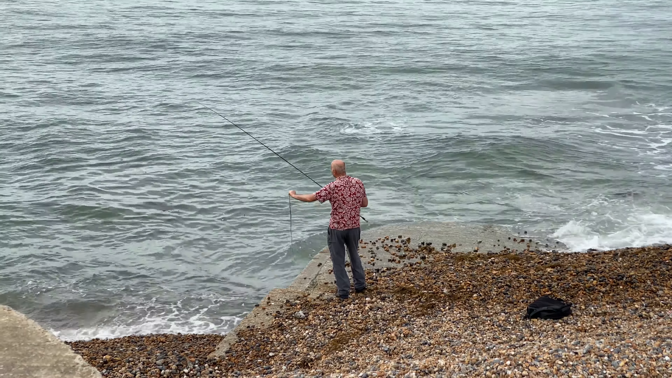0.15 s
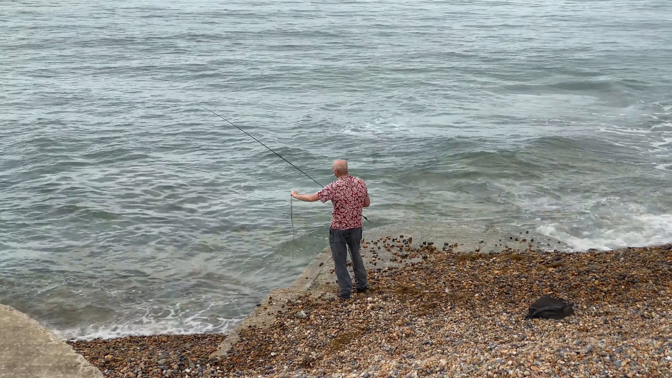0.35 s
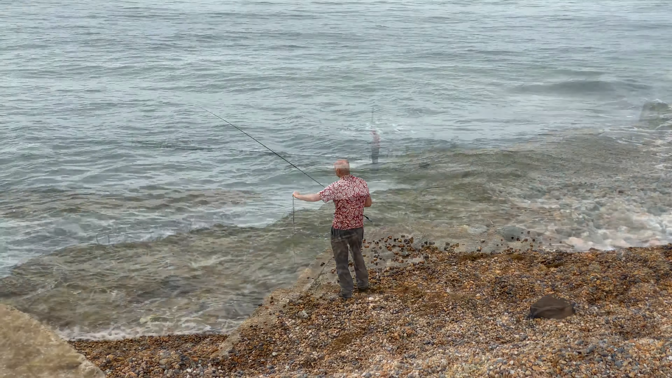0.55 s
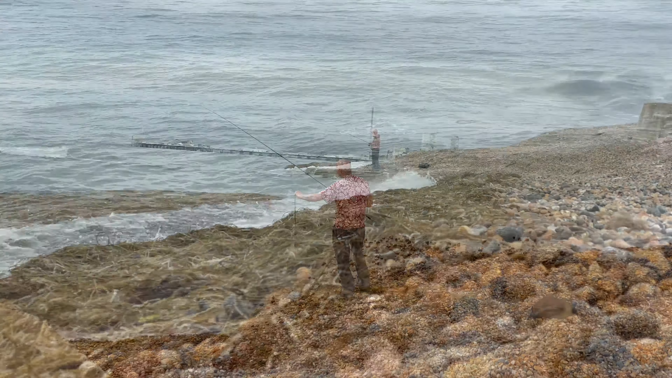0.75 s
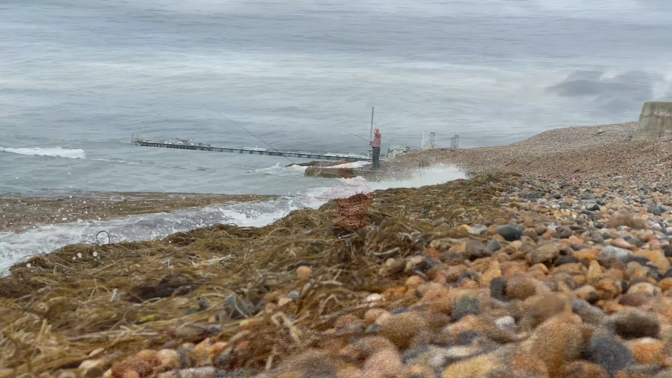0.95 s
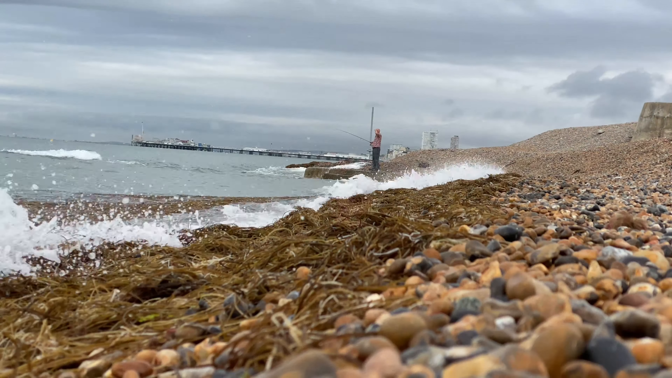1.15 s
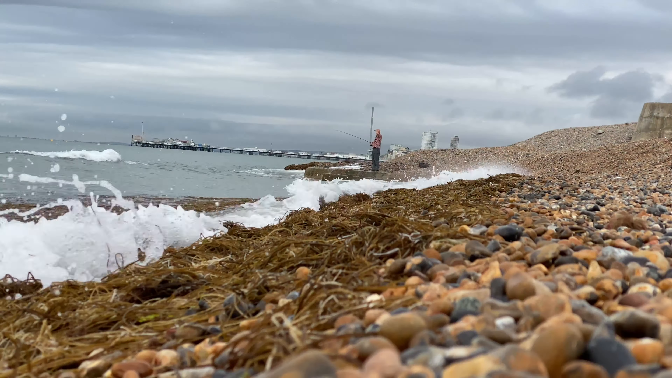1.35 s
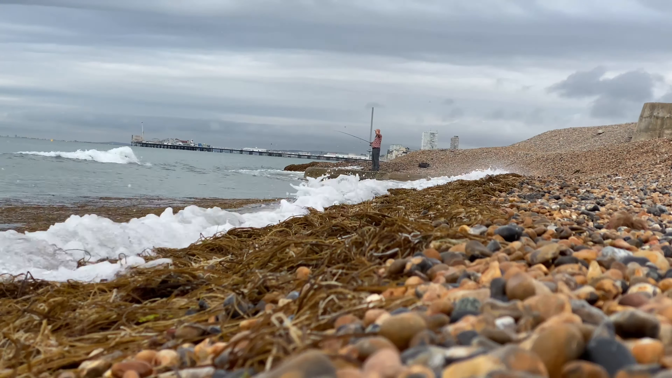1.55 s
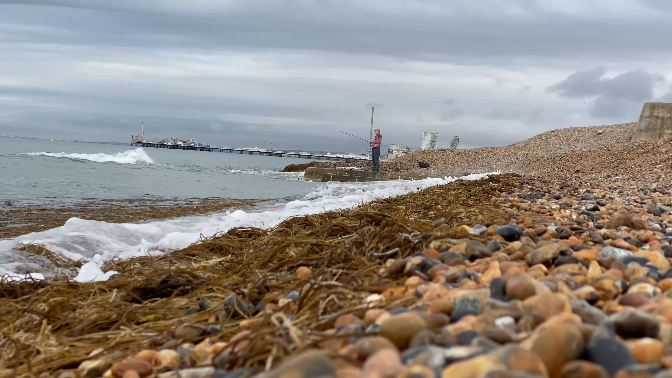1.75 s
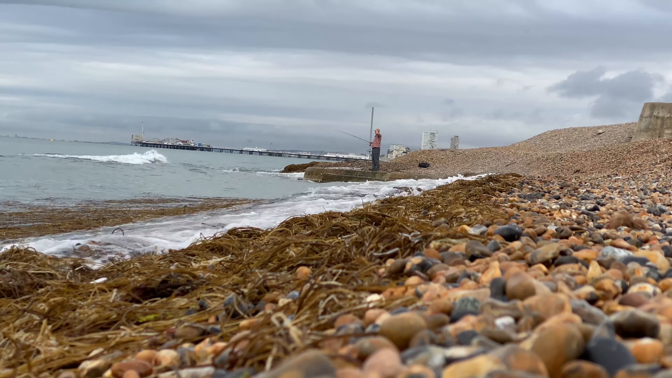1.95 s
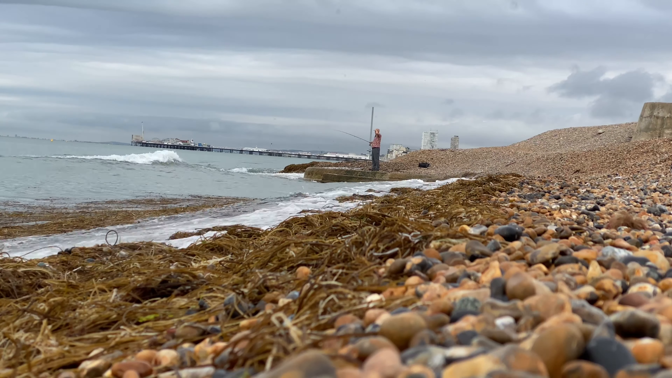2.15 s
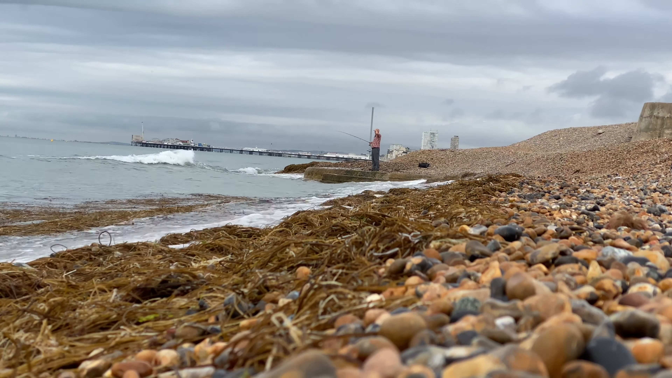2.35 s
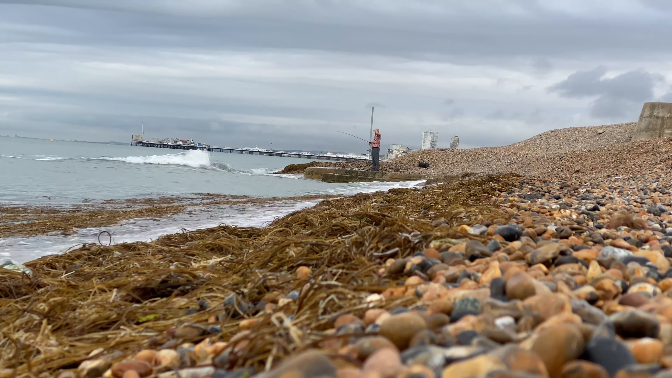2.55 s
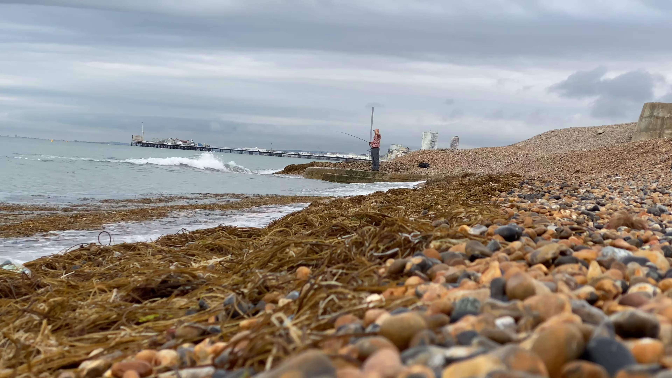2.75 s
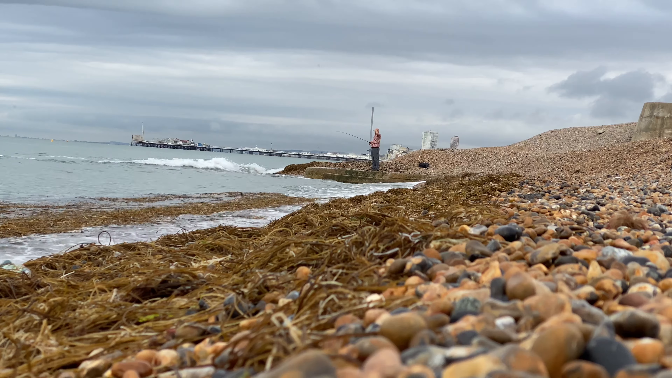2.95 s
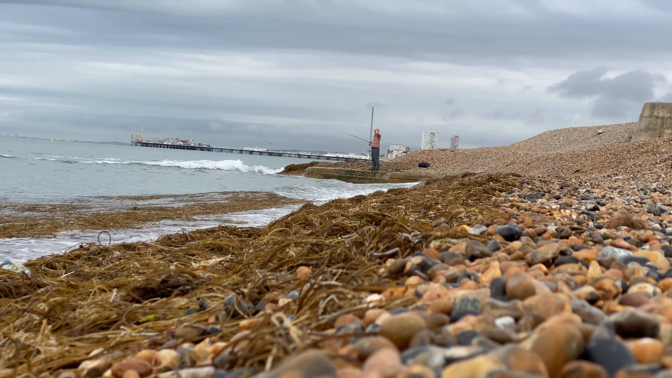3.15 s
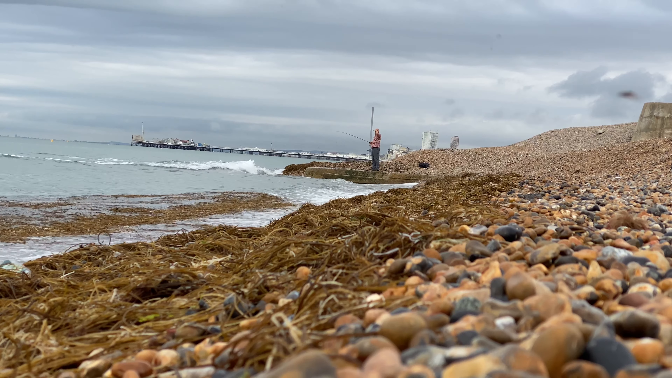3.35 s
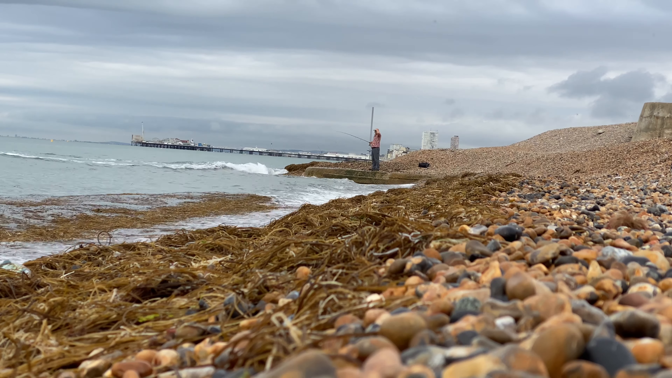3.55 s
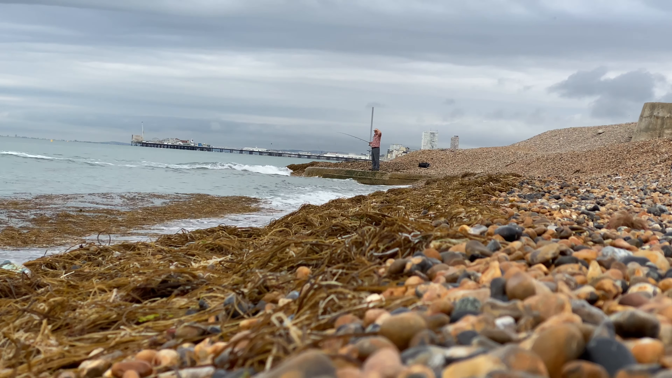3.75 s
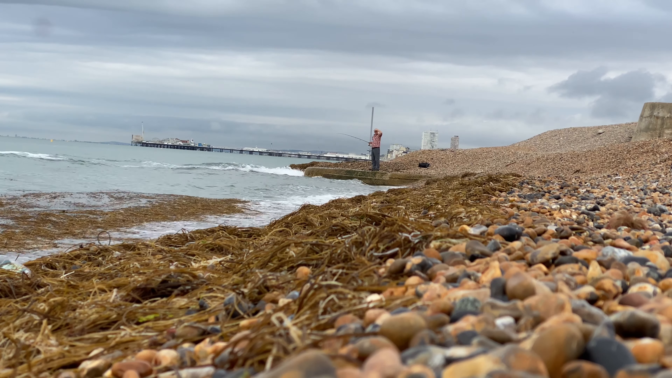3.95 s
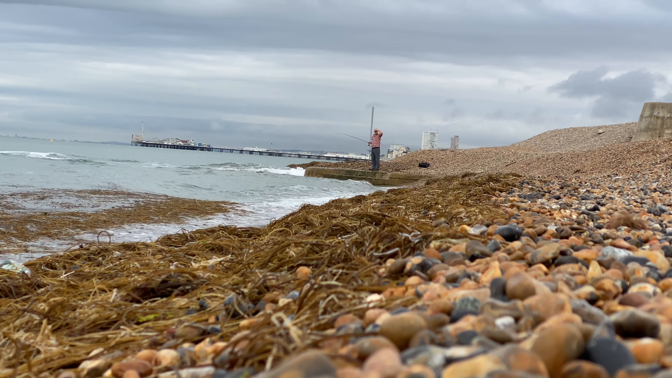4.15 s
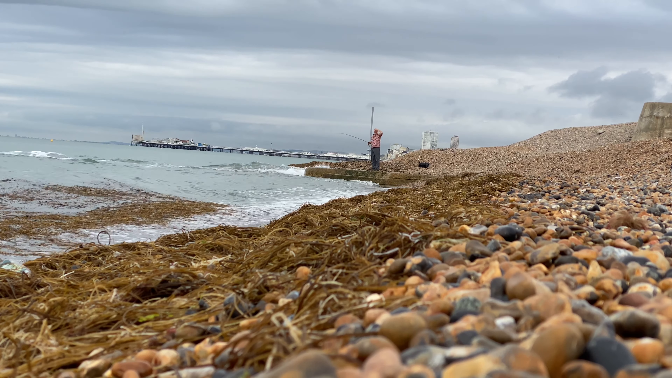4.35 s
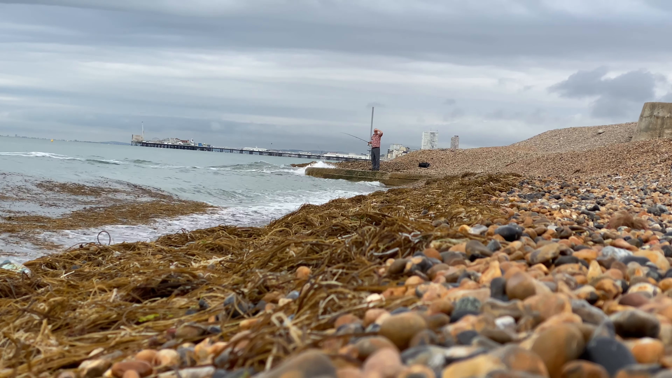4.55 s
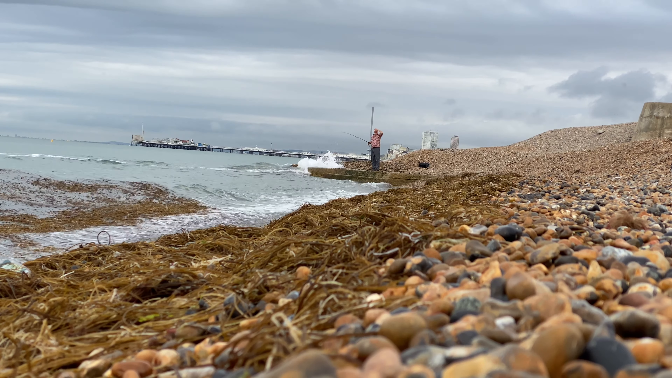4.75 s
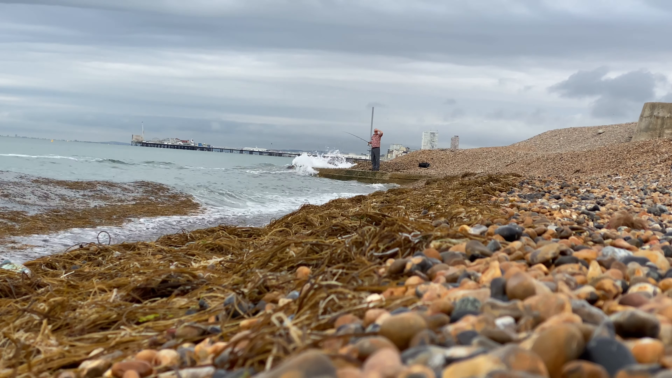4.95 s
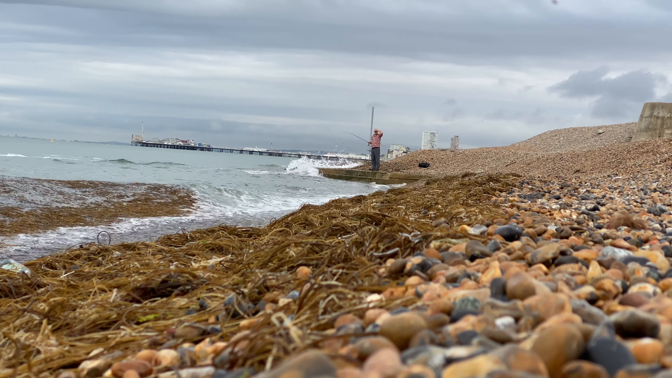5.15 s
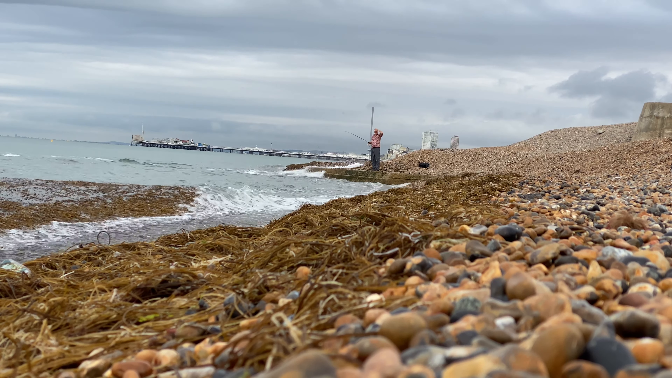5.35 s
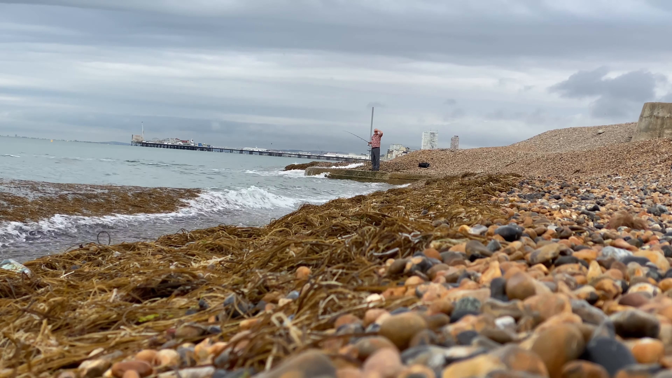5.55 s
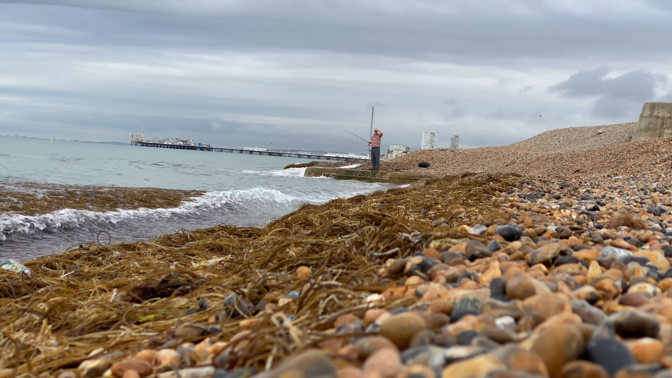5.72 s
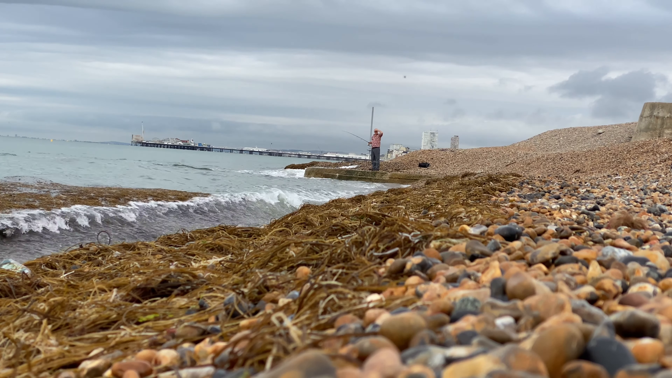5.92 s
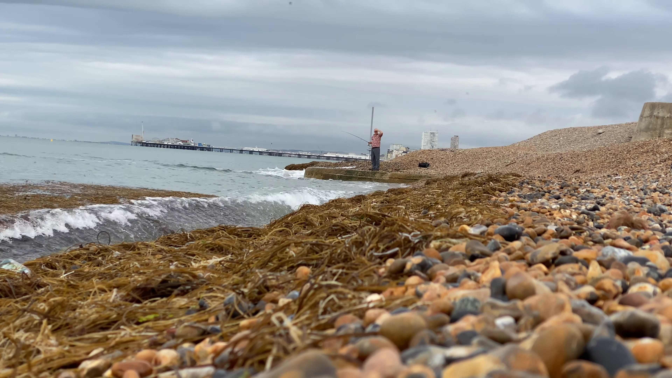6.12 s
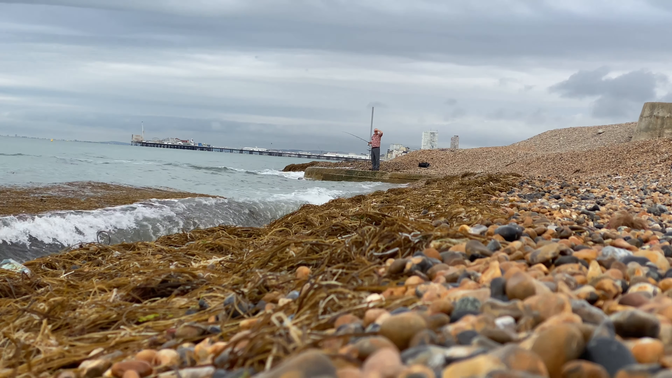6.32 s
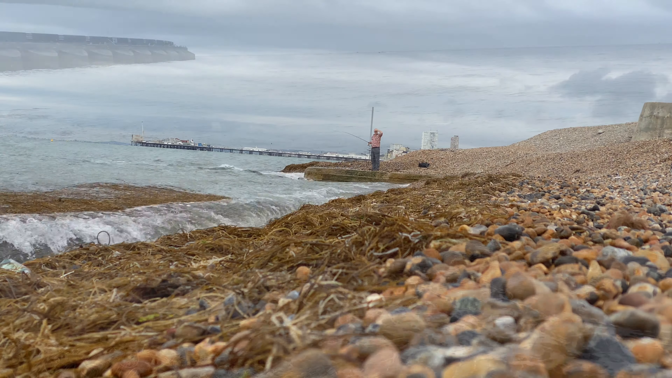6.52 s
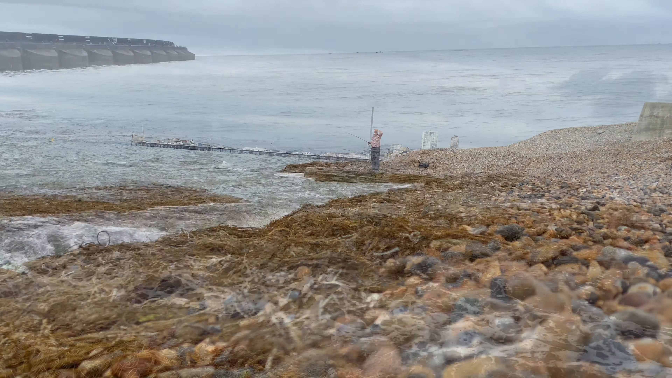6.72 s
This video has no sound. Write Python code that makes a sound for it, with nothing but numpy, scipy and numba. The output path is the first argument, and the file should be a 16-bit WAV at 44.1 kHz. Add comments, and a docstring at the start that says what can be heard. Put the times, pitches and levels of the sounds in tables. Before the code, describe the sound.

Outdoors on a pebble shore, heard in stereo from low among the stones. It starts with quiet foamy wash, faint distant sea hiss and soft wind rumble. From 0.3 s a wave swells; at 0.65 s its crest lands with hollow low thumps, then booms and roars, strongest around 0.9 to 1.3 s, full of rounded bubble glugs and bright fizzing spray. A splashy wash follows near 1.4 to 1.6 s, then it falls away; a drop ticks at 1.8 s. From 1.7 to 3 s foam thins over scattered pebble knocks. Gurgles and plops lap around 3.4 to 4 s. The quietest stretch, about 4.3 to 5.8 s, leaves dense, dry pebble clicks and light rattling. Near 6.1 s a low slosh and gurgles return, spray and rattle rise from 6.3 s, and another rushing, splashing water scene fades in, opening wide until the cut near 6.9 s.

```python
"""A small wave thumps and roars ashore on a pebble beach, heard from two ports lying low among the stones.
The surf is coloured noise mixed with showers of short rings; crest thumps, bubbles and ticks are dying sines.
Foam washes and fizzes, water gurgles, and pebbles click and rattle in the backwash as two-pitch knocks.
The far sea hisses steadily and wind rumbles on the microphone.
Another scene of rushing water fades in at the end, wide between the channels.
"""
import sys
import numpy as np
from scipy import signal
from scipy.fft import rfft, irfft
from scipy.io import wavfile
from scipy.ndimage import uniform_filter1d
from numba import njit

SR = 44100
rng = np.random.default_rng(int(sys.argv[2]) if len(sys.argv) > 2 else 0)


def wrap_up_sound(samples):
    """Save the sound to the file named by the first command line argument, as 16-bit audio."""
    columns = np.atleast_2d(samples).T
    # keep every value between -1 and 1, then stretch to whole-number steps
    tamed = np.clip(columns, -1, 1)
    steps = np.round(tamed * 32767).astype(np.int16)
    wavfile.write(sys.argv[1], SR, steps)


N = 303408
T, HZ = np.arange(N) / SR, np.fft.rfftfreq(N, 1 / SR)

# Far sea, a steady hiss: colour (frequency [Hz], gain [dB])
FAR_COLOUR = [(200, -13), (320, 4.5), (420, -3.5), (800, -9), (1300, -15), (2500, -13), (4000, -35.5),
              (8000, -23.5), (12000, -26), (16000, -30)]
FAR_DB = -50

# Wind on the ports, deep rumble and quicker flutter: colours (frequency [Hz], gain [dB])
RUMBLE_COLOUR = [(22, -34), (32, -16), (42, -3), (55, 3), (68, 4.5), (85, -7.5), (120, -32)]
FLUTTER_COLOUR = [(55, -21), (75, -3.5), (95, 4), (120, -2.5), (150, -4), (230, -15)]
# Gusts: (time [s], half length [s], rumble [dB], flutter [dB])
GUSTS = [(0.05, 0.088, -63, -40.5), (0.68, 0.058, -39, -38), (1.473, 0.12, -52, -34.5),
         (2.854, 0.056, -39, -63), (4.07, 0.052, -44, -58), (5.733, 0.23, -48, -44.5),
         (6.66, 0.043, -53, -37.5)]
STEADY_RUMBLE_DB, STEADY_FLUTTER_DB = -49.5, -51
# The falling crest shakes the same low bands, at these levels relative to its boom
CREST_RUMBLE_DB, CREST_FLUTTER_DB = -18, -9.5

# A drop ticks close by and bounces: (time [s], level [dB])
TICKS = [(1.8133, -24.5), (1.8301, -34)]
# What a tick rings with: (frequency [Hz], relative level [dB], t60 [s])
TICK_MODES = [(4700, -21, .0035), (5900, -6, 0.0056), (7250, 0, 0.0036), (10000, -6, .003),
              (13700, -4, .003)]

# Water gurgles between the stones as it drains and laps back: (time [s], level [dB])
GURGLE = [(0, -80), (3.2, -74), (3.45, -53), (3.7, -47), (3.87, -45.5), (4.1, -56), (4.3, -72), (4.9, -75),
          (5.1, -56), (5.3, -52), (5.6, -57), (5.85, -58), (5.98, -66), (6.04, -55), (6.08, -62),
          (6.12, -57), (6.15, -58), (6.18, -46), (6.21, -54), (6.24, -46), (6.3, -62), (6.5, -76),
          (6.88, -80)]
# Its colour: (frequency [Hz], gain [dB])
GURGLE_COLOUR = [(500, -17), (650, -11), (830, -7), (1000, -7), (1300, -13)]

# Pebbles dragged by the backwash: (time [s], rattle level [dB])
RATTLE = [(0, -56.5), (1.4, -56), (1.7, -69), (2.5, -62), (3.4, -79), (4.1, -73), (4.5, -62), (4.9, -56),
          (5.2, -57.5), (5.5, -55.5), (5.75, -56.5), (5.95, -57), (6.15, -56), (6.4, -51.5), (6.65, -50),
          (6.8, -50), (6.88, -53)]
# Their colour: (frequency [Hz], gain [dB])
RATTLE_COLOUR = [(1200, -38), (2000, -3.5), (3000, -1.5), (4500, 2), (6000, 0), (7500, -2), (9000, -43)]
# Single pebbles knock: (time [s], level [dB], pitch [Hz], crack over pitch [dB], crack pitch [Hz])
KNOCKS = [(1.6893, -27, 1960, -3, 3550), (1.721, -25, 1580, -14, 4500), (1.9118, -30, 1560, -8, 5500),
          (2.038, -31, 1800, -2.5, 3600), (2.198, -28, 1630, -6, 6500), (2.288, -39, 1950, -4, 4500),
          (2.3666, -24, 2120, -7.5, 2700), (2.4004, -31.5, 1980, -3, 5070), (2.4386, -37, 1880, 2, 4270),
          (2.4945, -36, 1830, 0, 2830), (2.5169, -34, 2030, -4, 2820), (2.5445, -33, 2210, -7, 6630),
          (2.718, -39, 2260, -5, 3190), (2.8177, -37, 1930, -5, 3260), (2.8277, -40, 1820, 4, 5980),
          (3.2547, -33, 1980, -15, 3150), (3.433, -36, 1930, -6, 2790), (3.6224, -44, 1920, 4, 4660),
          (3.9067, -42, 1720, 0, 4280), (3.9775, -28, 1930, -11, 2710), (4.3901, -35, 2400, -8, 2930),
          (4.4242, -34, 2540, -4, 3420), (4.4625, -38, 1830, -6, 3500), (4.4844, -38, 1600, -5, 3500),
          (4.6803, -38, 1780, -2, 3540), (4.5972, -39, 2470, -6, 4000), (4.7119, -35, 2100, 0, 3810),
          (4.717, -34, 2150, -3, 4500), (4.733, -44, 2000, 2, 5800), (4.7448, -41, 1980, -8, 3000),
          (4.7615, -33, 1750, -2, 3300), (4.778, -37, 1800, -2, 4500), (4.771, -44, 2000, 4, 6500),
          (4.802, -49, 2000, 6, 7000), (4.86, -37, 1900, 0, 5000), (4.8795, -31, 2060, -3, 4600),
          (4.885, -33, 1900, -8, 3000), (4.9027, -34, 1850, -2, 5490), (4.9314, -36, 2240, -8, 2700),
          (4.9384, -34, 2240, -6, 2900), (5.0042, -42, 1800, -10, 3000), (5.0486, -37, 1860, -10, 3000),
          (5.0601, -36.5, 2200, 4.5, 3900), (5.0985, -35, 1930, -4, 3000), (5.1394, -44, 1800, -3, 3500),
          (5.213, -34, 2020, -7, 3940), (5.2382, -41, 1960, -3, 4500), (5.258, -43, 2000, 5, 5800),
          (5.2821, -34, 1700, -8, 3980), (5.316, -41, 1830, 2, 6400), (5.3494, -43, 1860, 4, 4160),
          (5.438, -45, 2010, -1, 3460), (5.4517, -40, 2410, 3, 5070), (5.4926, -40, 2370, -8, 4520),
          (5.557, -42, 1670, -5, 2870), (5.678, -37.5, 1790, 4, 3660), (5.709, -39, 1780, -5, 2850),
          (5.7866, -38, 1940, -3, 4520)]
# Extra modes of a struck pebble: (frequency [Hz], level relative to the crack [dB], t60 [s])
CRACK_MODES = [(2570, -3.5, 0.0081), (3370, -1.5, 0.0077), (4200, -4.5, 0.0054), (5300, -7, 0.006),
               (6470, -7, 0.0054), (7300, -18, 0.005)]
KNOCK_T60_S, CRACK_T60_S = 0.007, 0.0043
# Crack modes are loudest near the crack pitch: width, and drop far from it
CRACK_OCTAVES, CRACK_DROP_DB = 0.53, -2
# Fainter random knocks, thickest as the backwash drains: (from [s], thickest [s], to [s])
STRAY_S = [1.7, 4.95, 5.75]
# Centres of the random draws, and the scatter of level
STRAY_DB, STRAY_SCATTER_DB, STRAY_HZ, STRAY_CRACK_DB = -51.5, 3.5, 1900, -2.5
SLIDE_S = 0.03  # time spread within a slide of stones
SCATTER_T60_S, SCATTER_DB = 0.021, -5.5  # neighbouring stones scatter every knock

# Big bubbles burst in the churn and the backwash: (time [s], level [dB], starting pitch [Hz])
GLUGS = [(0.689, -18, 640), (0.763, -27, 930), (0.923, -22, 762), (1.056, -21, 590), (1.135, -25, 580),
         (1.186, -17, 640), (1.246, -18, 511), (1.29, -24, 595), (1.366, -32, 710), (1.413, -25, 606),
         (1.452, -25, 482), (1.508, -26, 674), (1.549, -28, 480), (1.589, -17, 945), (1.651, -23, 729),
         (1.7, -26, 616), (1.783, -30, 568), (1.846, -25, 554), (1.912, -25, 570), (1.975, -18, 940),
         (2.041, -26, 680), (2.169, -28, 593), (2.753, -31, 635), (2.843, -27, 630), (2.941, -30, 730),
         (3.041, -37, 770), (3.219, -28, 635), (3.419, -23, 1180), (3.458, -25, 650), (3.52, -36, 867),
         (3.642, -29, 821), (3.72, -34, 837), (3.829, -35, 645), (3.856, -23, 870), (3.909, -37, 690),
         (4.002, -34, 1010), (4.084, -36, 910), (5.142, -33, 785), (5.201, -36, 636), (5.279, -43, 891),
         (6.029, -39, 580), (6.11, -33, 554), (6.164, -38, 511), (6.221, -36, 775), (6.409, -31, 476),
         (6.464, -29, 614)]
# Cycles to fall 60 dB, pitch rise over that time as a fraction, and soft onset
GLUG_CYCLES, GLUG_GLIDE, GLUG_SWELL_S = 21, 0.098, 0.0025

# Spray and splash: (time [s], fizz of spray [dB], splash of water over the stones [dB])
SPRAY = [(0, -62, -55), (0.3, -54, -56), (0.53, -47, -52.5), (0.66, -42, -48), (0.74, -45.5, -51),
         (0.95, -39.5, -45), (1.09, -44, -50), (1.22, -37.5, -49), (1.32, -38, -45), (1.41, -37.5, -40),
         (1.5, -38, -42), (1.58, -40.5, -46), (1.68, -48, -54), (1.95, -52.5, -67), (2.4, -53, -51),
         (3.2, -57, -53.5), (3.8, -64, -51.5), (4.1, -70, -50.5), (4.4, -80, -50.5), (4.9, -72, -52.5),
         (5.3, -70, -53), (5.85, -67, -59), (6.26, -55, -61), (6.33, -48, -61), (6.52, -51.5, -55),
         (6.7, -48, -46.5), (6.88, -46.5, -43)]
# Their colours: (frequency [Hz], gain [dB])
FIZZ_COLOUR = [(3000, -10.5), (5000, -2), (7000, -1.5), (9000, -2), (11000, -5), (13000, -7.5), (16000, -8)]
SPLASH_COLOUR = [(1500, -7.5), (2300, 2), (3000, 3.5), (4000, -2.5), (5000, -6.5), (6500, -11), (9000, -42)]

# Another scene of rushing water fades in at the end: (time [s], level [dB])
RUSH = [(0, -90), (6.0, -73), (6.25, -61), (6.45, -53), (6.6, -48), (6.68, -45), (6.72, -40), (6.76, -37.5),
        (6.79, -41), (6.83, -33), (6.86, -43), (6.88, -34)]
# Its colour: (frequency [Hz], gain [dB])
RUSH_COLOUR = [(200, -8), (270, 12), (340, 17), (450, 5), (600, -1), (1300, -7), (1860, -9), (2280, 3),
               (2560, 8), (2950, -12), (3500, -4), (4200, -2), (4700, -3), (5250, -27), (6700, -14),
               (8000, -24)]

# Trapped air thumps as the crest folds over: (time [s], level [dB], starting pitch [Hz], t60 [s])
THUMPS = [(.641, -19, 130, 0.1), (.650, -11, 397, 0.029), (.655, -20, 437, 0.11), (.79, -16, 402, 0.063),
          (.845, -18, 459, 0.072), (.93, -15, 213, .1), (.955, -13, 450, 0.059), (.965, -23, 932, 0.29),
          (1.008, -19, 444, 0.054), (1.045, -21, 148, 0.078), (1.075, -18, 400, 0.095),
          (1.115, -18, 620, 0.061), (1.175, -34, 159, 0.086), (1.225, -24, 264, 0.092),
          (1.27, -21, 300, 0.054)]
# Body of the surf: (time [s], boom of falling crest [dB], roar of tumbling water [dB], wash of foam [dB])
SURF = [(0.0, -66, -51.5, -45.5), (0.27, -42.5, -46, -46), (0.5, -38, -45, -48), (0.65, -28, -33, -38),
        (0.75, -30, -27.5, -36.5), (0.85, -24, -28.5, -33.5), (0.95, -25, -26, -32),
        (1.02, -21, -26, -32.5), (1.07, -21, -23.5, -33), (1.13, -24.5, -25, -34), (1.2, -21, -25, -33.5),
        (1.27, -25, -25.5, -33.5), (1.33, -25.5, -29.5, -37), (1.4, -28.5, -30.5, -34),
        (1.47, -30.5, -28.5, -34), (1.52, -31, -29, -34), (1.56, -29, -27, -29.5), (1.6, -30, -34, -35),
        (1.7, -35, -31.5, -39.5), (2.0, -37, -36.5, -41), (2.3, -38, -37, -42), (2.65, -42.5, -40.5, -42.5),
        (2.8, -40, -37.5, -43), (2.95, -41.5, -40, -45), (3.2, -44, -38.5, -41), (3.42, -45, -41, -41.5),
        (3.55, -49, -46, -44), (3.7, -45.5, -44, -43.5), (3.93, -48.5, -53.5, -44.5),
        (4.05, -51, -51, -44.5), (4.15, -49, -57, -46.5), (4.3, -53, -56, -49), (4.6, -52, -58, -56.5),
        (5.08, -59, -55.5, -55), (5.25, -51, -51.5, -59), (5.8, -53.5, -57.5, -54.5),
        (5.97, -49, -53, -54.5), (6.06, -49.5, -47, -53), (6.11, -44, -48, -51), (6.16, -44, -50.5, -51),
        (6.28, -44, -43.5, -55), (6.35, -42.5, -47, -49.5), (6.47, -43, -43.5, -50),
        (6.55, -43.5, -43.5, -51), (6.8, -39.5, -40, -47), (6.88, -44, -41.5, -53)]
# Its colours: (frequency [Hz], gain [dB])
BOOM_COLOUR = [(80, -34), (120, -1), (170, -1.5), (230, -3.5), (350, 0.5), (450, -3), (700, -28)]
ROAR_COLOUR = [(250, -7.5), (400, -3), (550, 2), (750, 0.5), (850, -1), (930, -2), (1060, -7),
               (1250, -12.5), (1800, -36)]
WASH_COLOUR = [(800, 2), (1100, 4.5), (1330, 0), (1600, 3), (1900, 1.5), (2400, -2.5), (3200, -12),
               (5000, -30)]

# Power that both ports share in the water and wind layers: (frequency [Hz], share [0-1])
DIRECT = [(50, 0.98), (250, 1), (450, 0.8), (650, 0.84), (800, 0.56), (950, 0.95), (1200, 0.53),
          (1500, 0.42), (1900, 0.97), (2500, 0.1), (7000, 1), (7500, 0.9), (16000, 0.92)]
# Balance between the ports: (frequency [Hz], left minus right [dB])
TILT = [(50, -1.5), (260, -3), (430, -0.5), (600, 1), (780, 4), (950, 3.5), (1300, 2), (1900, 1.5),
        (2200, -2), (16000, 0.5)]
# Phase between the ports, used below TREBLE_HZ: (frequency [Hz], left ahead of right [rad])
LEAD = [(30, .1), (90, .18), (260, .62), (430, 1.02), (600, 1.2), (800, 1.6), (950, 1.1), (1120, 1.8),
        (1400, -.6), (1640, -.2), (1810, -.7), (2200, 0), (16000, 0)]
# From this frequency up the phase between left and right turns with frequency, once per 1/TREBLE_TURN_S Hz
TREBLE_HZ, TREBLE_TURN_S = 7250, 1 / 3445
# Presence band whose stereo width changes: (low edge [Hz], high edge [Hz])
PRESENCE_HZ = [2030, 7400]
# Width of that band before and after it opens, and when it opens
NARROW_DB, WIDE_DB, OPENS_S, OPEN_S = -31, 5.5, 6.2, 6.58
TOP_HZ = 15700

LOUDEST_GRAIN = 3  # cap on the random loudness draw, in spreads


def undb(db):
    """Decibels to gain."""
    return 10 ** (np.asarray(db) / 20)


def unit(x):
    """Scale to rms 1."""
    return x / np.sqrt(np.mean(x ** 2))


def along_hz(table):
    """Read a (frequency, value) table at every bin on a log-frequency axis."""
    hz, value = np.transpose(table)
    return np.interp(np.log(HZ + 1), np.log(hz + 1), value)


def along_s(table):
    """Read each column of a (time, value, ..) table at every sample."""
    s, *columns = np.transpose(table)
    return [np.interp(T, s, column) for column in columns]


def walk(rate):
    """A random control with rate steps per second, smoothed twice; spread near 1."""
    hold = int(SR / rate)
    steps = np.repeat(rng.standard_normal(N // hold + 1), hold)
    return 0.88 * uniform_filter1d(uniform_filter1d(steps, hold), hold)[:N]


@njit
def ring(rows, n, sr):
    """Sum dying sines (time, size, Hz, t60, glide), each cut at its t60; glide is the pitch rise by then."""
    y = np.zeros(n)
    for s, size, hz, t60, glide in rows:
        start, phase = int(s * sr), 0.
        for k in range(min(int(t60 * sr), n - start)):
            age = k / (t60 * sr)
            phase += 2 * np.pi * hz * (1 + glide * age) / sr
            y[start + k] += size * np.sin(phase) * 1000. ** -age
    return y


def hits(table, glide):
    """Blows (time [s], level [dB], pitch [Hz], t60 [s]) that each ring one gliding pitch."""
    s, db, hz, t60 = np.transpose(table)
    return ring(np.column_stack([s, undb(db), hz, t60, glide + 0 * s]), N, SR)


def grains(count, low_hz, high_hz, cycles, spread_db, glide):
    """A shower of rings at random times and pitches, with exponentially scattered levels in dB."""
    when, pitch, chance = rng.random((count, 3)).T
    hz = low_hz * (high_hz / low_hz) ** pitch
    loudness = np.minimum(-np.log(1 - chance), LOUDEST_GRAIN)
    size = undb(spread_db * loudness) * np.sqrt(hz / low_hz)
    return unit(ring(np.column_stack([when * N / SR, size, hz, cycles / hz, glide + 0 * hz]), N, SR))


def ports(direct, around=0.):
    """Spectra at the two ports: tabled phase below the treble, a turning phase above it, and a level tilt."""
    turn = 2 * np.pi * HZ * TREBLE_TURN_S
    # the phase turns fastest where the ports oppose each other, so those bands are narrow
    lead = np.where(HZ < TREBLE_HZ, along_hz(LEAD), 0.22 * np.sin(turn) - turn)
    tilt = undb(along_hz(TILT) / 2)
    pair = np.array([direct, direct * np.exp(-1j * lead)])
    return (pair + around) * np.array([tilt, 1 / tilt])


def water(colour, level_db, shower, grain_share, swell_db, flicker_db, flicker_rate):
    """Noise and grains in one colour; half-octave bands swell together and flicker alone."""
    noise = rfft(rng.standard_normal((3, N)))
    grain = rfft(shower)
    # flattened first, so that the colour alone sets the broad spectrum
    grain /= np.sqrt(uniform_filter1d(abs(grain) ** 2, size=4000) / N) + 1e-9
    direct = np.clip(along_hz(DIRECT), 0, 1)
    near = np.sqrt(grain_share) * grain + np.sqrt(1 - grain_share) * noise[0]
    both = ports(np.sqrt(direct) * near, np.sqrt(1 - direct) * noise[1:])
    both = both * undb(along_hz(colour))
    octave, swell, out = np.log2(HZ + 1), walk(25), 0
    for centre in np.arange(np.log2(colour[0][0]), np.log2(colour[-1][0]) + .5, .5):
        band = np.cos(np.pi * np.clip(octave - centre, -.5, .5)) ** 2
        movement_db = swell_db * swell + flicker_db * walk(flicker_rate)
        out = out + irfft(both * band, N) * undb(movement_db)
    return unit(out) * undb(level_db)


def far_sea(pops):
    """Far surf blurs into a steady broadband hiss with a little fine grain."""
    return water(FAR_COLOUR, FAR_DB, pops, 0.15, 0.26, 0.29, 20.0)


def wind_levels():
    """Rumble and flutter in dB: powers of steady wind, bell-shaped gusts and crest shake add up."""
    boom_db = along_s(SURF)[0]
    s, half, rumble_db, flutter_db = np.transpose(GUSTS)
    bells = np.exp(-((T[:, None] - s) / half) ** 2)

    def level(steady_db, crest_db, gust_db):
        power = undb(2 * steady_db) + undb(2 * (boom_db + crest_db)) + bells @ undb(2 * gust_db)
        return 10 * np.log10(power)

    return (level(STEADY_RUMBLE_DB, CREST_RUMBLE_DB, rumble_db),
            level(STEADY_FLUTTER_DB, CREST_FLUTTER_DB, flutter_db))


def wind():
    """Air buffets the ports: low noise and slow rings in a deep and a quicker band."""
    rumble_db, flutter_db = wind_levels()
    buffets = grains(count=400, low_hz=39.5, high_hz=142, cycles=8.9, spread_db=-1.0, glide=-0.1)
    return (water(RUMBLE_COLOUR, rumble_db, buffets, 0.13, 0.25, 0.64, 9.5)
            + water(FLUTTER_COLOUR, flutter_db, buffets, 0.23, 0.26, 0.24, 4.5))


def ticks():
    """A bouncing drop: each tick rings the same few high modes."""
    return hits([(s, db + mode_db, hz, t60) for s, db in TICKS for hz, mode_db, t60 in TICK_MODES], 0.)


def gurgle(big_bubbles, surge):
    """Water draining and lapping between stones: mostly bubble rings in a narrow middle band."""
    level_db = along_s(GURGLE)[0] + 1.3 * surge
    return water(GURGLE_COLOUR, level_db, big_bubbles, 0.94, 1.0, 1.9, 14)


def rattle(surge, chatter):
    """Dragged pebbles clack together: noise and short bright rings that swell strongly."""
    level_db = along_s(RATTLE)[0] + 0.53 * surge + 1.1 * chatter
    clacks = grains(count=2200, low_hz=1460, high_hz=7860, cycles=9.3, spread_db=2.0, glide=0.)
    return water(RATTLE_COLOUR, level_db, clacks, 0.38, 3.4, 0.89, 27)


def strays(count, size):
    """Rows of faint knocks: count slides of size stones each, at random levels and pitches."""
    slide = np.repeat(rng.random(count), size)
    z = np.clip(rng.standard_normal((count * size, 5)).T, -2, 2)
    first, thickest, last = STRAY_S
    # half of the slides fall within the thickest second
    s = np.interp(slide, [0, .3, .8, 1], [first, thickest - .4, thickest + .6, last]) + SLIDE_S * z[3]
    db = STRAY_DB + STRAY_SCATTER_DB * z[0]
    hz = STRAY_HZ * np.exp(0.24 * z[1])
    crack_db = STRAY_CRACK_DB + 2.4 * z[2]
    crack_hz = np.clip(4600 * np.exp(0.21 * z[4]), 2500, 8000)
    return np.column_stack([s, db, hz, crack_db, crack_hz])


def scattered(x):
    """The sound plus a short noisy smear of echoes off the stones around it."""
    age = np.arange(SR // 20) / SR
    tail = rng.standard_normal(len(age)) * undb(-60 * age / SCATTER_T60_S)
    tail = tail / np.sqrt(np.sum(tail ** 2))
    return x + undb(SCATTER_DB) * signal.fftconvolve(x, tail)[:N]


def pebbles():
    """A struck pebble rings its pitch, its crack pitch and crack modes, favouring those near the crack."""
    s, db, hz, crack_db, crack_hz = np.vstack([KNOCKS, strays(count=150, size=6)]).T
    out = hits(np.column_stack([s, db, hz, KNOCK_T60_S + 0 * s]), 0.)
    out = out + hits(np.column_stack([s, db + crack_db, crack_hz, CRACK_T60_S + 0 * s]), 0.)
    for mode_hz, mode_db, mode_t60 in CRACK_MODES:
        u = rng.random((len(s), 3)).T
        far = 1 - np.exp(-(np.log2(mode_hz / crack_hz) / CRACK_OCTAVES) ** 2)
        # each mode is up to 1.5 ms late, up to 6 dB down and up to 9 % off pitch
        late = s + 0.0015 * u[0]
        level_db = db + crack_db + mode_db - 6 * u[1] + CRACK_DROP_DB * far
        pitch = mode_hz * (0.91 + 0.18 * u[2])
        out = out + hits(np.column_stack([late, level_db, pitch, mode_t60 + 0 * s]), 0.)
    return scattered(out)


def glugs():
    """Each big bubble swells softly, then rings down over a number of cycles as its pitch rises."""
    age = T[:SR // 8]
    out = np.zeros(N + len(age))
    for s, db, hz in GLUGS:
        start = int(s * SR)
        life = age * hz / GLUG_CYCLES
        shape = (1 - np.exp(-age / GLUG_SWELL_S)) * undb(-60 * life)
        # half the glide in the phase makes the full glide in the pitch
        tone = np.sin(2 * np.pi * hz * age * (1 + GLUG_GLIDE * life / 2))
        out[start:start + len(age)] += undb(db) * shape * tone
    return out[:N]


def spray(pops, droplets, surge, chatter):
    """Spray fizzes in very short high rings; water splashes over the stones in longer, lower ones."""
    fizz_db, splash_db = along_s(SPRAY)
    fizz_db = fizz_db + 0.63 * surge + 1.1 * chatter
    splash_db = splash_db + 0.33 * surge + 1.3 * chatter
    return (water(FIZZ_COLOUR, fizz_db, pops, 0.37, 0.23, 0.49, 18)
            + water(SPLASH_COLOUR, splash_db, droplets, 0.46, 0.33, 1.0, 18))


def rushing_water(droplets, surge, chatter):
    """Another scene of rushing water fades in: mostly droplet rings with strong band flicker."""
    level_db = along_s(RUSH)[0] + 0.62 * surge + 1.6 * chatter
    return water(RUSH_COLOUR, level_db, droplets, 0.77, 1.1, 2.5, 21.85)


def crest_thumps():
    """Air trapped under the folding crest rings low, rising in pitch."""
    return hits(THUMPS, 0.164)


def surf(big_bubbles, surge, chatter):
    """The crest booms with air cavities, tumbling water roars with big bubbles, foam washes with small ones."""
    boom_db, roar_db, wash_db = along_s(SURF)
    roar_db = roar_db + 2.3 * surge + 0.2 * chatter
    wash_db = wash_db + 1.8 * surge + 0.37 * chatter
    cavities = grains(count=1500, low_hz=108.7, high_hz=475, cycles=9.1, spread_db=0.0, glide=0.29)
    small_bubbles = grains(count=5000, low_hz=905, high_hz=3280, cycles=20.0, spread_db=3.5, glide=0.46)
    return (water(BOOM_COLOUR, boom_db, cavities, 0.18, 0.61, 0.8, 4.5)
            + water(ROAR_COLOUR, roar_db, big_bubbles, 0.34, 0.63, 1.3, 9)
            + water(WASH_COLOUR, wash_db, small_bubbles, 0.45, 0.2, 0.99, 21))


def scene():
    """Far sea, wind, the layers of water and the single blows, summed at the two ports."""
    # slops of water and slips of shingle: slow and quick level swings shared by the water layers
    surge, chatter = walk(16), walk(38)
    pops = grains(count=20000, low_hz=3800, high_hz=14800, cycles=3.9, spread_db=-2.0, glide=.2)
    droplets = grains(count=8000, low_hz=1720, high_hz=7200, cycles=22, spread_db=2.5, glide=0.3)
    big_bubbles = grains(count=3000, low_hz=352, high_hz=1282, cycles=12.2, spread_db=1.5, glide=0.33)
    blows = ticks() + pebbles() + glugs() + crest_thumps()
    return (far_sea(pops)
            + wind()
            + gurgle(big_bubbles, surge)
            + rattle(surge, chatter)
            + spray(pops, droplets, surge, chatter)
            + rushing_water(droplets, surge, chatter)
            + surf(big_bubbles, surge, chatter)
            + irfft(ports(rfft(blows)), N))


def record(dry):
    """The presence band sits near the centre, then opens wide late on; the top is cut."""
    presence = signal.butter(10, PRESENCE_HZ, "band", fs=SR, output="sos")
    side = signal.sosfiltfilt(presence, (dry[0] - dry[1]) / 2)
    width = undb(np.interp(T, [OPENS_S, OPEN_S], [NARROW_DB, WIDE_DB]))
    wet = dry - side * (1 - width) * np.array([[1], [-1]])
    top_cut = signal.ellip(10, .2, 70, TOP_HZ, fs=SR, output="sos")
    return signal.sosfilt(top_cut, wet)


dry = scene()
out = record(dry)
wrap_up_sound(out)
```